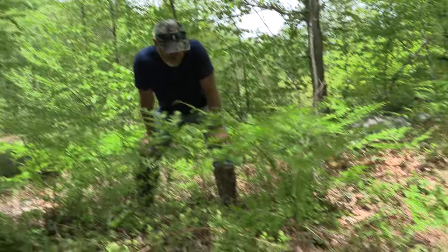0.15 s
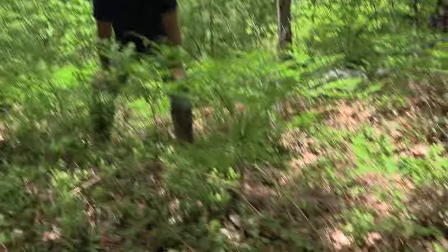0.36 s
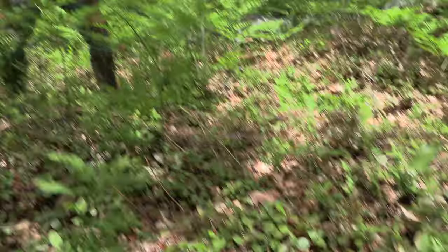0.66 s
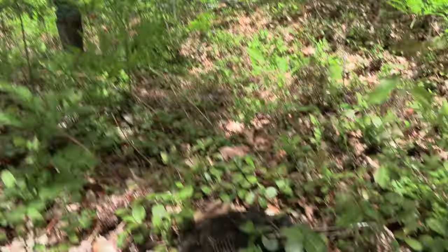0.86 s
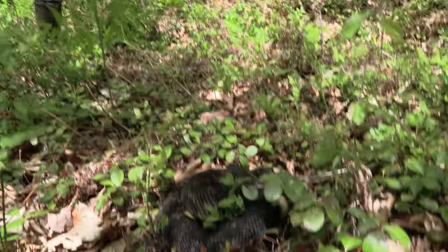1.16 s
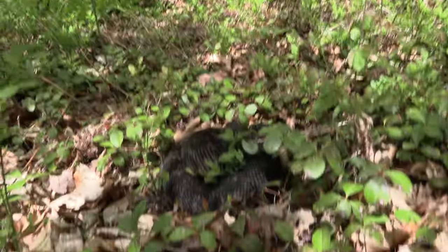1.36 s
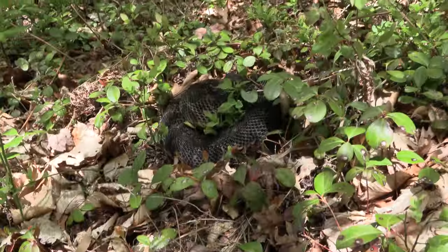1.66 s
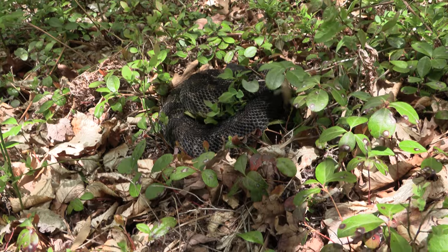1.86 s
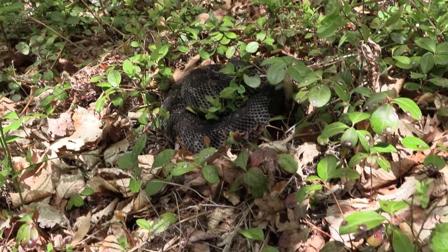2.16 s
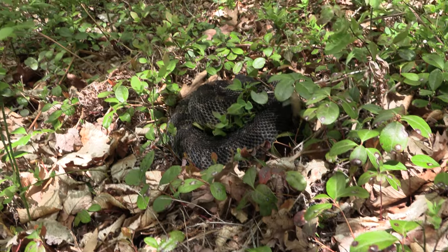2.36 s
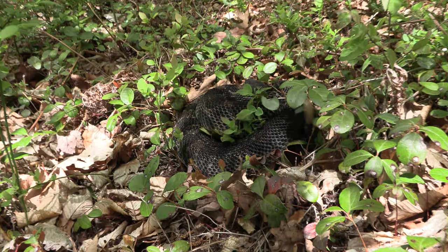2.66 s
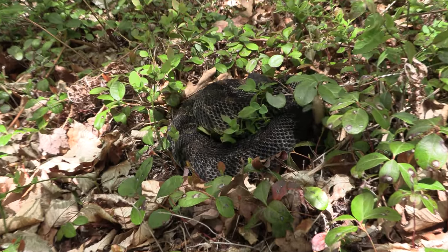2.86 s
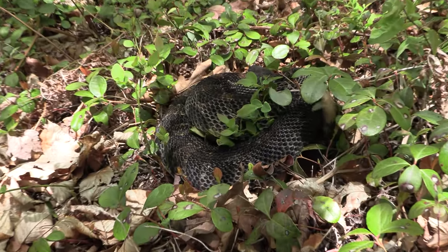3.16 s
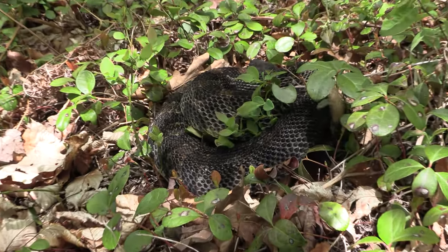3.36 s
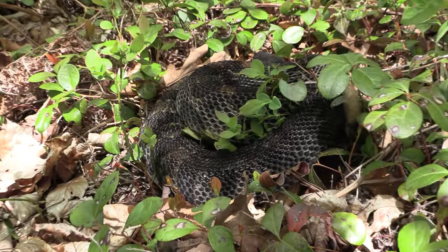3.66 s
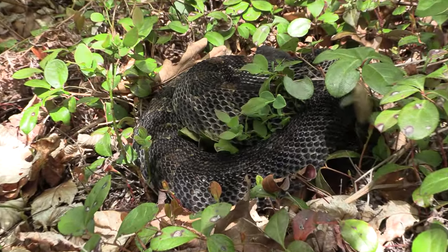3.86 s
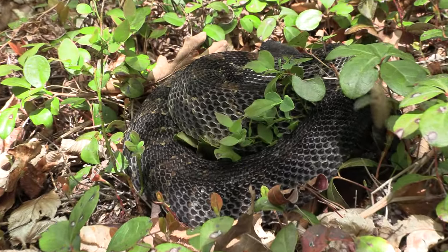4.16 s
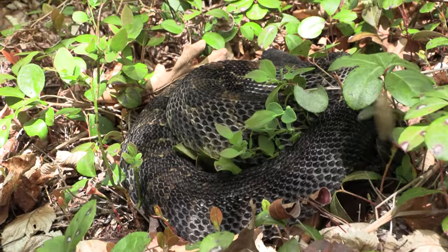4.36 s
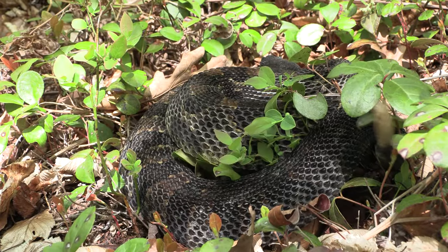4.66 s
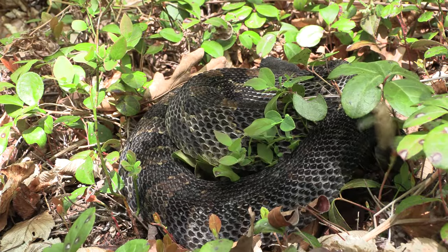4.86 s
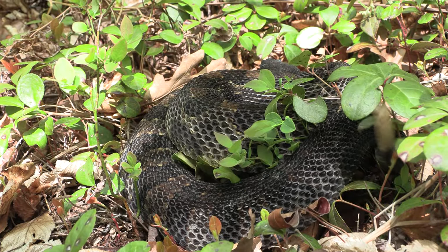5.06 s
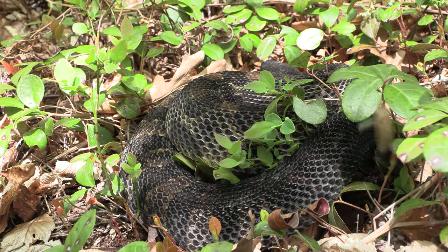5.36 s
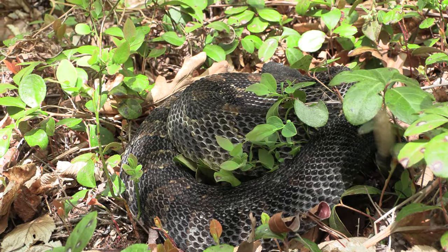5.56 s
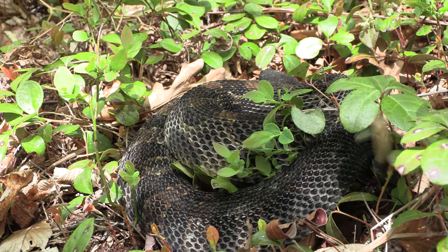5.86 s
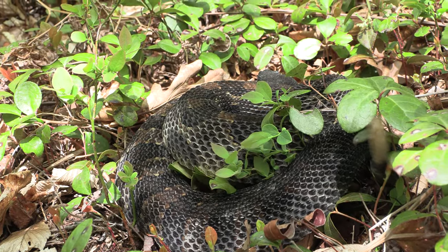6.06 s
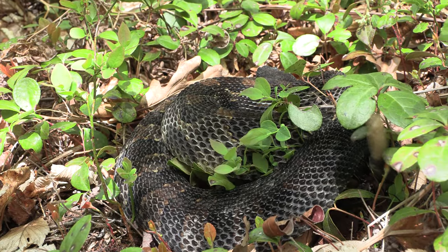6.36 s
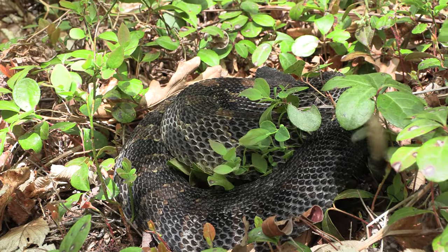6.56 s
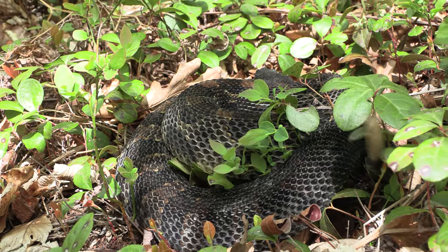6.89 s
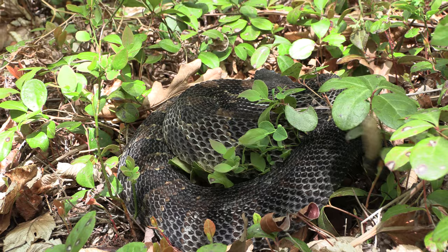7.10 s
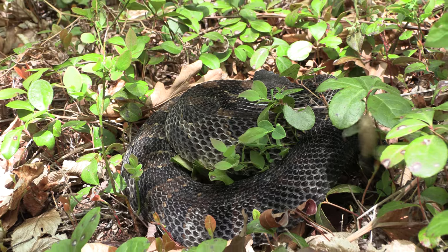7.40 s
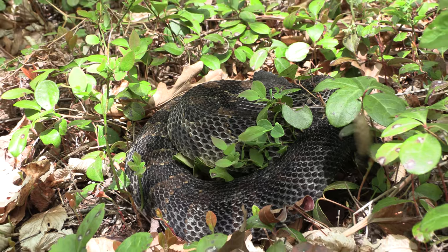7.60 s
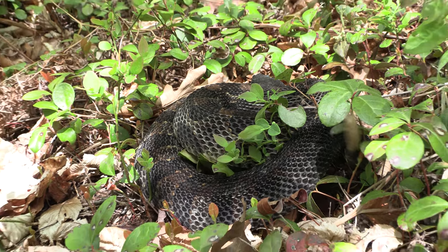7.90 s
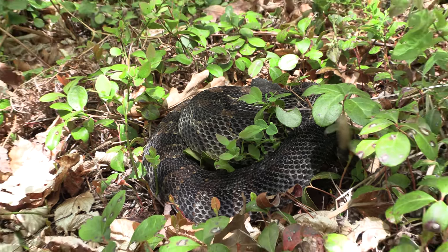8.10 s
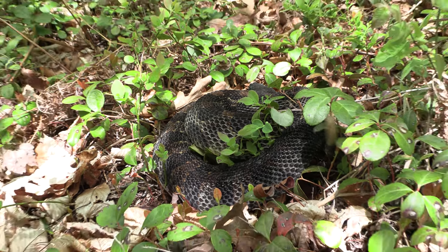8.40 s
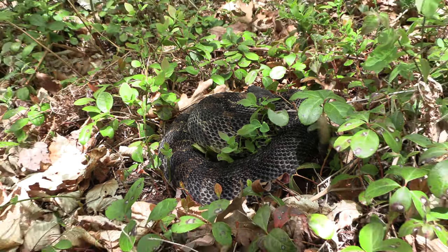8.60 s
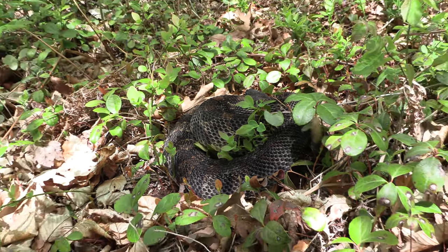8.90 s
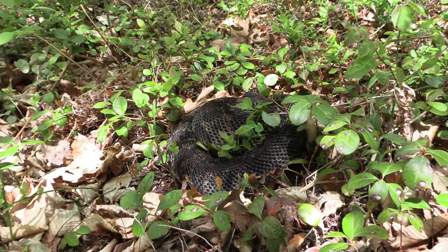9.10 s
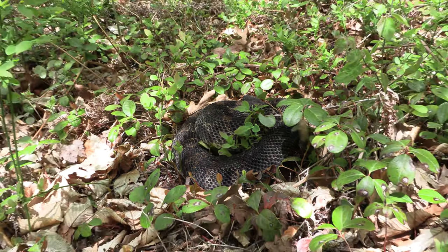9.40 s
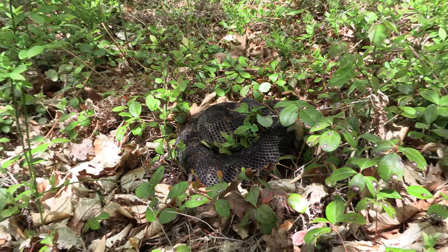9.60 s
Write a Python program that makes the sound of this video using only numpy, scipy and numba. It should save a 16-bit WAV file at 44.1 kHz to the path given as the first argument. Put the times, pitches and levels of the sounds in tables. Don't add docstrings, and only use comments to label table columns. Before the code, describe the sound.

Continuous sizzling rattlesnake warning in woodland, muffled at first then opening up, with camera handling bumps, leaf scuffs and a low zoom-motor rumble.

```python
import sys
import numpy as np
from scipy import signal
from scipy.fft import rfft, irfft, next_fast_len
from scipy.io import wavfile
from scipy.ndimage import uniform_filter1d, map_coordinates
from numba import njit

SR = 44100
rng = np.random.default_rng(int(sys.argv[2]) if len(sys.argv) > 2 else 0)


def store_pcm(level_fs):
    pcm = np.round(np.clip(level_fs, -1, 1) * 32767).astype(np.int16)
    wavfile.write(sys.argv[1], SR, np.atleast_2d(pcm).T)


def voltage_ratio(level):
    return 10 ** (np.asarray(level, float) / 20)


N = 429534
TIME = np.arange(N) / SR


def unit(x):
    return x / np.sqrt(np.mean(x ** 2))


def curve(table):
    s, *columns = np.transpose(table)
    return [np.interp(TIME, s, column) for column in columns]


@njit
def svf(x, hz, damp):
    band, low = np.empty(len(x)), np.empty(len(x))
    b, l = 0., 0.
    for i in range(len(x)):
        g = np.tan(np.pi * hz[i] / SR)
        v = (b + g * (x[i] - l)) / (1 + g * (g + damp))
        band[i] = damp * v
        low[i] = l + g * v
        b, l = 2 * v - b, l + 2 * g * v
    return band, low


def ring(x, hz, width_hz):
    turn = 2 * np.pi * hz / SR
    damp = width_hz / hz * turn / np.sin(turn)
    return svf(x, np.full(len(x), 1. * hz), damp)[0]


def walk(rate):
    hold = int(SR / rate)
    steps = np.repeat(rng.standard_normal(N // hold + 1), hold)
    return unit(uniform_filter1d(uniform_filter1d(steps, hold), hold)[:N])


def coloured(points):
    below, above = (points[0][0] / 2, -40), (points[-1][0] * 2, -40)
    hz, db = np.transpose([below, *points, above])
    size = next_fast_len(N)
    bins_hz = np.fft.rfftfreq(size, 1 / SR)
    gain = voltage_ratio(np.interp(np.log(bins_hz + 1), np.log(hz), db))
    return unit(irfft(rfft(rng.standard_normal(size)) * gain, size)[:N])


def clicks(density, scatter_db):
    hit = rng.random(N) < density / SR
    return hit * rng.standard_normal(N) * voltage_ratio(scatter_db * rng.exponential(size=N))


def swells(table):
    return [(np.exp(-((TIME - s) / length_s) ** 2 / 2), db) for s, length_s, db in table]


def spells(table, ramp_s):
    gain = np.zeros(N)
    for start_s, end_s, start_db, end_db in table:
        gate = np.clip(np.minimum(TIME - start_s, end_s - TIME) / ramp_s + .5, 0, 1)
        gain += gate * voltage_ratio(np.interp(TIME, [start_s, end_s], [start_db, end_db]))
    return gain


def settle(db, fall_db_s, rest_db, table):
    power = voltage_ratio(db - fall_db_s * TIME) ** 2 + voltage_ratio(rest_db) ** 2
    return np.sqrt(power + sum((voltage_ratio(top_db) * bell) ** 2 for bell, top_db in swells(table)))


# time_s, level_db
TAIL_LEVEL = [(0, -32.5), (.13, -32.5), (.5, -30), (1.08, -29), (1.41, -30.5), (1.62, -29), (1.8, -31),
              (9.74, -31.5)]
# time_s, rate_swing_pairs_per_s
TAIL_PACE = [(0.0, 33.65), (0.47, 33.12), (1.09, 34.8), (2.58, 34.19), (2.84, 34.57), (4.13, 33.43),
             (4.62, 34.15), (5.47, 34.1), (7.26, 32.67), (8.15, 32.36), (8.55, 34.36), (9.74, 33.95)]
SIDE_SWAPS = [1.78, 3.55, 6.45, 8.65]
# place_0_to_1, rise_0_to_1, fall_0_to_1, strength_db, lean_change_db, lean_shift_0_to_1
SWING_KNOCKS = [
    (.165, .046, .024, 1, -1.6, 0),
    (.405, .05, .035, -3.6, 1.4, .025),
    (.665, .046, .024, 1, 1.6, 0),
    (.905, .05, .035, -3.6, -1.4, -.025),
]
# pitch_hz, width_hz, level_db, chatter_over_knocks_db, common_blows_0_to_1, lag_swing_pairs
HORN_SEGMENTS = [(2580, 780, -17, 3, 0.4, -0.019), (3707, 895, -6, 5.5, 0.07, -0.031),
                 (4664, 536, -1.84, 5, 0.11, 0.011), (5820, 830, -5.5, -1.5, 0.59, 0.0092),
                 (7300, 1450, -7.5, 0.5, 0.38, -0.026), (9080, 1060, -10, -0.5, 0.7, -0.0069),
                 (10497, 770, -9, -2.5, 0, -0.00099), (11500, 1500, -16, -4, .4, 0),
                 (13440, 2500, -11, 12, 0.4, 0.015), (15400, 3000, -12.5, 2, .4, 0.026)]


def rattle():
    rate, level_db = curve(TAIL_PACE)[0], curve(TAIL_LEVEL)[0]
    swap_s = .09
    lean = np.prod([np.clip((s - TIME) / swap_s, -1, 1) for s in SIDE_SWAPS], axis=0)
    swings = np.cumsum(rate) / SR + 0.0063 * walk(60)
    flurry = 0
    for place, rise, fall, db, lean_db, shift in SWING_KNOCKS:
        apart = (swings - place - lean * shift + .5) % 1 - .5
        rise = rise * voltage_ratio(-2 * lean * lean_db)
        swing_number = (swings - place + .5).astype(int) % 1000
        force_db = db + lean * lean_db + 0.86 * rng.standard_normal(1000)[swing_number]
        flurry = flurry + voltage_ratio(force_db) * np.exp(-(apart / np.where(apart < 0, rise, fall)) ** 2 / 2)
    common = clicks(9000, 0.35)
    out = 0
    for hz, width_hz, db, chatter_db, share, lag in HORN_SEGMENTS:
        knocks = np.sqrt(share) * common + np.sqrt(1 - share) * clicks(9000, 0.27)
        knocks = unit(np.roll(flurry, int(lag * SR / rate.mean())) * knocks)
        blows = knocks + voltage_ratio(chatter_db) * unit(clicks(12000, 0.41))
        rung = ring(ring(blows, hz, 1.5 * width_hz), hz, 1.5 * width_hz)
        out = out + voltage_ratio(db) * unit(rung)
    return unit(out) * voltage_ratio(level_db + 6.5)


# time_s, shadow_edge_hz, treble_leak_db, leak_detour_ms
CAMERA_TURN = [(0, 7240, -3, 0.56), (.4, 7240, -5.5, 0.31), (.72, 8500, -10, 0.7), (.95, 10000, -8, 0.55),
               (1.2, 10500, -7, 0.375), (1.45, 11800, -4, 0.41), (1.8, 14000, 0, .3)]
# time_s, pitch_hz, lift_db
FACE_GLINT = [(0, 3340, 2.5), (.25, 3700, 2.5), (.48, 5360, 4.5), (.7, 5900, 4.5), (.9, 5930, 2.5),
              (1.2, 6940, 1.5), (1.5, 7950, -1)]
# pitch_hz, width_hz, clear_by_s, change_db
HIDDEN_BANDS = [(1600, 1260, 1.0, -14), (3070, 730, 1.03, 5), (4640, 460, 0.53, -3), (7220, 610, 2, -4.5),
                (10500, 610, 1.4, -8), (13000, 2400, .4, -7)]
# time_s, pitch_hz, depth_0_to_1
RIM_NOTCH = [(0, 5800, .1), (.22, 6500, .2), (.4, 7200, .25), (.6, 8800, .55), (.8, 10800, .75),
             (.92, 11900, .6), (1.05, 13300, .25), (1.3, 15800, .3), (1.5, 17000, 0)]
# multiple_of_rim_band, depth_0_to_1, clear_by_s
LONGER_ROUNDS = [(1.4, .55, .8), (2.2, .55, .45)]


def shade(x):
    edge_hz, leak_db, detour_ms = curve(CAMERA_TURN)
    glint_hz, lift_db = curve(FACE_GLINT)
    x = x + (voltage_ratio(lift_db) - 1) * svf(x, glint_hz, 0.77)[0]
    x = x + (voltage_ratio(-3) - 1) * ring(x, 2905, 117)
    for hz, width_hz, clear_s, db in HIDDEN_BANDS:
        hidden_db = db * np.clip(2 - 2 * TIME / clear_s, 0, 1)
        x = x + (voltage_ratio(hidden_db) - 1) * ring(x, hz, width_hz)

    low = svf(svf(x, edge_hz, 1.85)[1], edge_hz, .77)[1][::-1].copy()
    back_hz = edge_hz[::-1].copy()
    low = svf(svf(low, back_hz, 1.85)[1], back_hz, .77)[1][::-1]
    treble = x - low
    late = map_coordinates(treble, [np.arange(N) - detour_ms * SR / 1000], order=3)
    heard = low + voltage_ratio(leak_db) * (treble + 0.25 * (1 - voltage_ratio(leak_db)) * late)

    rim_hz, depth = curve(RIM_NOTCH)
    notches = [(0.95, depth)]
    for multiple, deep, clear_s in LONGER_ROUNDS:
        notches.append((multiple, deep * np.clip(2 - 2 * TIME / clear_s, 0, 1)))
    for multiple, share in notches:
        hz = np.minimum(multiple * rim_hz * (1 + .03 * walk(8.3)), .45 * SR)
        flickering = np.clip(share * (1 + .15 * walk(8.6)), 0, 1)
        heard = heard - flickering * svf(heard, hz, .24)[0]
    return heard


# time_s, length_s, level_db
AIR_GUSTS = [(.3, 0.13, -52), (0.46, 0.033, -45.5), (0.648, .06, -53), (.99, 0.13, -52.5),
             (1.7, 0.047, -60), (2.85, .04, -63), (5.47, 0.05, -61), (7.08, .03, -70), (7.948, 0.045, -66)]
# time_s, length_s, level_db
HUSH_STIRS = [
    (4.8, 0.47, -61.5),
    (8.35, 0.26, -70),
]
# pitch_hz, level_db
HUSH_SPECTRUM = [(70, -15), (150, -3.5), (300, -1), (600, -1.5), (1000, 1), (1600, 4), (2400, -3),
                 (4000, -27)]


def wood_air():
    air = coloured([(15, -15), (35, -5.5), (70, -10.0), (130, -13.0)]) * voltage_ratio(2.5 * walk(9))
    hush = coloured(HUSH_SPECTRUM) * voltage_ratio(8.0 + 0.7 * walk(5.9))
    air_gain = settle(db=-60, fall_db_s=3, rest_db=-74.5, table=AIR_GUSTS)
    hush_gain = settle(db=-60.5, fall_db_s=2.4, rest_db=-67.5, table=HUSH_STIRS)
    return air * air_gain + hush * hush_gain


# start_s, end_s, start_level_db, end_level_db
WHINE_SPELLS = [
    (-.1, .8, -47, -64),
    (2.86, 3.05, -62, -62),
    (5.1, 6.8, -70, -65),
    (8.3, 8.6, -67, -65.5),
]


def motor_whine():
    pitch_hz, rest_db = 330.4, -72.5
    phase = 2 * np.pi * np.cumsum(pitch_hz + 9 * walk(30)) / SR
    whine = unit(np.sin(phase)) * voltage_ratio(3.5 * walk(30) - 9.0)
    return (spells(WHINE_SPELLS, 0.063) + voltage_ratio(rest_db)) * whine


# start_s, peak_db, pitch_hz, decay_t60_s
FINGER_THUMPS = [(0.177, -36.5, 114.3, 0.16), (0.224, -50, 122, 0.21), (0.292, -41, 115, 0.12),
                 (0.357, -39, 107, 0.15), (0.444, -44, 93, 0.055), (0.499, -42, 51.1, 0.12),
                 (0.598, -38.5, 118, 0.12), (0.919, -50, 110, 0.1), (0.979, -51, 51.1, 0.085),
                 (1.069, -54, 110, 0.11), (1.529, -51.5, 93.4, 0.12), (5.445, -45, 117, 0.059),
                 (5.491, -47, 96, 0.062), (5.554, -58, 102, 0.12), (5.587, -52, 137, 0.099),
                 (7.054, -51, 106, 0.123), (7.726, -51, 110, 0.12)]


def finger_thumps():
    rise, over_db = 0.0635, -15.5
    out = np.zeros(N + SR)
    t = TIME[:SR // 2]
    for s, db, hz, t60 in FINGER_THUMPS:
        tone = np.sin(2 * np.pi * hz * t) + voltage_ratio(over_db) * np.sin(2 * np.pi * 2.05 * hz * t)
        shape = (1 - np.exp(-t / (rise * t60))) ** 2 * 1000 ** (-t / t60) * tone
        out[int(s * SR):][:len(t)] += voltage_ratio(db) * shape / np.abs(shape).max()
    return out[:N]


# centre_s, peak_db, pitch_hz, length_cycles
RELEASES = [(0.437, -38, 254, 0.76), (1.077, -43, 238, 0.83), (1.531, -52, 228, 0.71),
            (2.4687, -30, 464, 0.38), (2.477, -48, 303, 1.2), (2.882, -51.5, 330, .7),
            (4.295, -41, 1100, .6), (4.5455, -19.5, 1700, 0.374), (4.6305, -26, 1600, 0.29),
            (4.672, -42.5, 1100, .5), (4.728, -37, 1250, 0.54)]


def ticks():
    out = np.zeros(N)
    t = np.arange(-600, 600) / SR
    for s, db, hz, cycles in RELEASES:
        pulse = np.cos(2 * np.pi * hz * t) * np.exp(-(t * hz / cycles) ** 2 / 2)
        out[int(s * SR) - len(t) // 2:][:len(t)] -= voltage_ratio(db) * pulse
    return out


# centre_s, length_s, level_db
FOOT_SCUFFS = [(1.09, 0.021, -46), (1.52, 0.18, -48.5), (2.048, 0.051, -40), (2.6, 0.11, -50),
               (3.416, 0.054, -44), (4.02, 0.0675, -45), (4.544, 0.059, -48), (5.05, 0.082, -46),
               (8.3, 0.13, -50)]
# pitch_hz, level_db
LEAF_SPECTRUM = [(150, -6), (400, -4), (1000, -1.5), (2000, 5), (3500, 1)]


def leaves():
    pressure = sum(voltage_ratio(db) * bell for bell, db in swells(FOOT_SCUFFS))
    return pressure * coloured(LEAF_SPECTRUM) * voltage_ratio(1.1 * walk(120))


# start_s, end_s, start_level_db, end_level_db
LENS_TRAVELS = [
    (2.6, 4.37, -56, -54),
    (6.85, 7.95, -66, -65),
    (7.95, 9.9, -56.5, -57.5),
]
# centre_s, length_s, change_db
DRIVE_STRAINS = [
    (2.79, 0.03, -6),
    (2.92, .04, 6),
    (3.5, 0.045, 6.5),
    (3.64, 0.0225, -10),
    (8.12, 0.0207, -9),
    (8.5, 0.034, -8),
    (9.09, 0.055, 6),
    (9.49, 0.02, -14),
]
# pitch_hz, level_db
DRIVE_SPECTRUM = [(80, -7), (105, -14.5), (135, -2.5), (165, 1), (190, 0), (208, -40), (230, -35)]


def lens_drive():
    judder_db = 1.5 * walk(14)
    load_db = sum(db * bell for bell, db in swells(DRIVE_STRAINS)) + judder_db
    return spells(LENS_TRAVELS, .04) * voltage_ratio(load_db) * coloured(DRIVE_SPECTRUM)


def scene():
    buzz = shade(rattle())
    near = motor_whine() + finger_thumps() + ticks() + lens_drive()
    around = wood_air() + leaves()
    return (buzz + near + around)[None]


def band_limit(x):
    return signal.sosfilt(signal.butter(12, 16920, fs=SR, output="sos"), x)


def record(dry):
    rounded = np.tanh(2.2 * dry) / 2.2
    size = next_fast_len(N)
    top_hz, slope_hz = 15765, 40
    kept = np.clip((top_hz - np.fft.rfftfreq(size, 1 / SR)) / slope_hz, 0, 1)
    mix = irfft(rfft(rounded, size) * kept, size)[:, :N]
    return band_limit(mix)


dry = scene()
out = record(dry)
store_pcm(out)
```